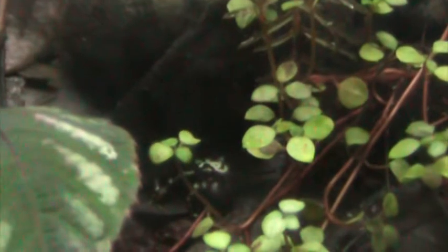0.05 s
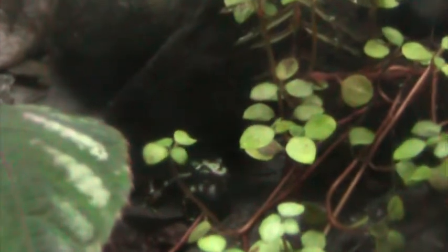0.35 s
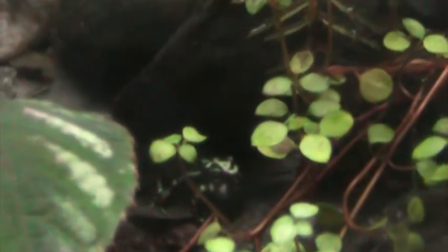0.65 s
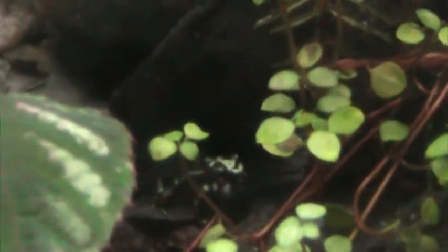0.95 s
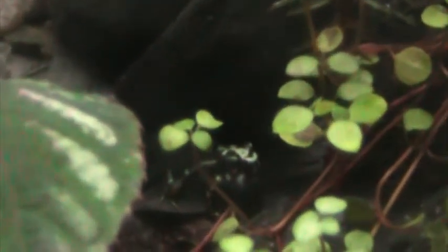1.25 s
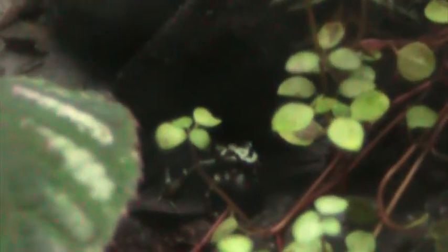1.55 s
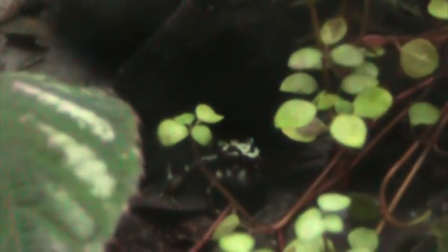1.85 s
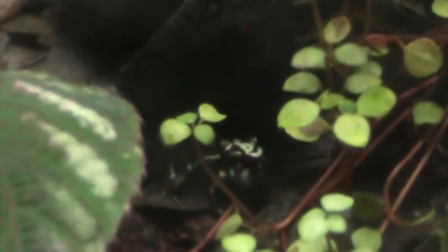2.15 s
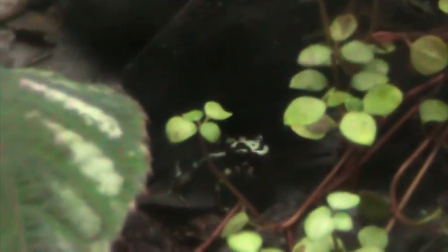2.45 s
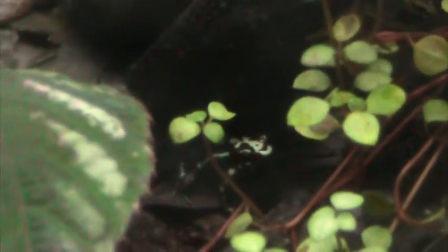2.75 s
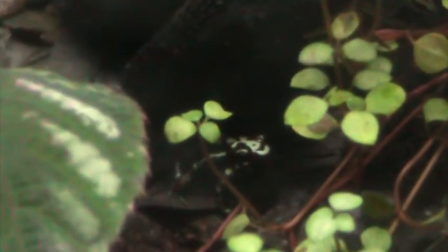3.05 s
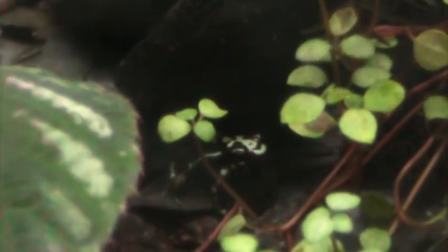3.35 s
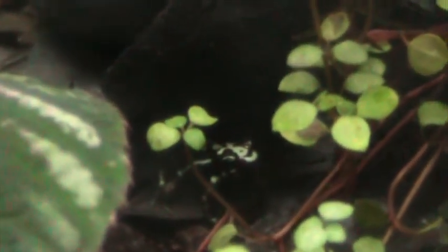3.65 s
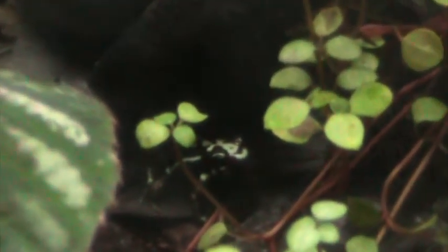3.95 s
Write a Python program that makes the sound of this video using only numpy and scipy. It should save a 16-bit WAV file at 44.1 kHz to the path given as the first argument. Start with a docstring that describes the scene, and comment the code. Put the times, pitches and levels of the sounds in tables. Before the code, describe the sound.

A small frog trills loudly, high and fast, close to the microphone in a glass terrarium, then stops. A second frog chirps faintly further off throughout, over a low fan hum and a few soft thuds.

```python
"""A bright trill, close by: a small poison frog in a glass terrarium sings thirty rising notes a second
that slow and sag, then one lower closing note. The glass echoes each note to a stereo microphone pair.
Further off, a second frog chirps faintly throughout. A fan hums in the room, soft low thuds, probably
footfalls, come through the floor, and there are a few faint rustles and ticks."""
import sys
import numpy as np
from scipy import signal
from scipy.fft import rfft, irfft, next_fast_len
from scipy.io import wavfile
from scipy.ndimage import uniform_filter1d

SR = 44100
rng = np.random.default_rng(int(sys.argv[2]) if len(sys.argv) > 2 else 0)


def int16_out(signal):
    """Quantize to a 16-bit WAV file."""
    q = np.round(np.clip(np.atleast_2d(signal).T, -1, 1) * 32767)
    wavfile.write(sys.argv[1], SR, q.astype(np.int16))


N = 176400


def near_frog():
    """A trill of upward sweeps slows, sags and grows louder; the vocal sac favours the second harmonic."""
    pitch_hz, sag_hz_per_s, swell_db_per_s = 2302, 21, 1.65
    closing_s, closing_hz, closing_db = 2.3105, 2195, -2.5
    times = note_times(first_s=.0029, gap_s=.03219, growth_s=.0000779, count=66)
    pitch_jitter, level_jitter, time_jitter, click_jitter = rng.standard_normal((len(times), 4)).T
    pitches = (pitch_hz - sag_hz_per_s * times) * (1 + .001 * pitch_jitter)
    levels = -.5 + swell_db_per_s * times + level_jitter
    envelope, phase = notes(np.append(times + .000311 * time_jitter, closing_s),
                            np.append(pitches, closing_hz), np.append(levels, closing_db),
                            sweep_hz_per_s=15000, bend_hz_per_s2=150000, rough_hz=16,
                            attack_s=.0098, release_s=.007)
    fundamental = undb(-27) * resonate(envelope * np.sin(phase), hz=2380, width_hz=110)
    second = envelope * np.sin(2 * phase)
    third = undb(-25) * resonate(envelope * np.sin(3 * phase), hz=5013, width_hz=450)
    rasp = undb(-42.5) * envelope * hiss(hz=5044, width_hz=980)
    t = clock() + .004  # a faint click comes 4 ms early, as each note opens
    click_envelope = sum(undb(db) * np.maximum(1 - abs(t - at) / .0042, 0)
                         for at, db in zip(times, -54.5 + 7 * click_jitter))
    return fundamental + second + third + rasp + click_envelope * hiss(hz=6700, width_hz=1900)


def terrarium(voice):
    """The glass throws early echoes to each microphone; tank and room add short tails."""
    # direct sound and echoes off the glass at the left and right microphones: delay/ms, level/dB
    glass_left = [(0, -15), (.552, -14), (3.954, -25), (5.156, -20), (14.272, -47)]
    glass_right = [(0, -18.6), (.797, -17.5), (3.334, -25), (5.235, -26), (7.334, -25.5), (11.635, -32.5)]
    right_lag_ms = .187
    left = echoes(voice, glass_left)
    right = echoes(voice, [(ms + right_lag_ms, db) for ms, db in glass_right])
    tank = undb(-37) * reverb(voice, t60_s=.07)
    room = undb(-29.5) * reverb(voice, t60_s=.29)
    return np.array([left, right]) + tank + room


def far_frog():
    """Fourteen lower chirps a second, distant and reverberant; each sweep's top rings the enclosure."""
    times = note_times(first_s=.046, gap_s=.07043, growth_s=.000064, count=56)
    pitch_jitter, level_jitter = rng.standard_normal((len(times), 2)).T
    envelope, phase = notes(times, 1683 * (1 + .007 * pitch_jitter), -48 + .56 * level_jitter,
                            sweep_hz_per_s=10000, bend_hz_per_s2=210000, rough_hz=48,
                            attack_s=.016, release_s=.034)
    voice = envelope * (np.sin(2 * phase) + undb(-8.5) * np.sin(3 * phase))
    voice += resonate(voice, hz=3510, width_hz=70)
    return undb(-2) * voice + undb(2.5) * reverb(voice, t60_s=.24)


def fan():
    """Room tone: the fan's wavering hum over its steady rush of air."""
    # fan and mains tones: f/Hz, level/dB
    hum_tones = [(120, -71.5), (240, -72), (300, -62.5), (478.5, -65.5), (598, -84.5), (798.5, -64),
                 (836, -59), (2509, -70)]
    # spectral density of the rushing air: f/Hz, relative level/dB
    air_spectrum = [(25, -1), (60, 0), (100, -8), (170, -4.5), (260, 0.5), (450, -0.5), (620, -3), (840, 2),
                    (1100, -4), (2000, -6.5), (2800, -10.5), (4400, -17), (7000, -20.5), (10000, -27),
                    (15500, -34.5)]
    # how alike the air sounds at the two microphones: f/Hz, correlation (-1 to 1)
    air_likeness = [(60, 0.023), (130, 0), (290, 0.052), (640, 0.62), (1400, 0.56), (3100, 0.65),
                    (12000, 0.016)]
    likeness, sides = over_spectrum(air_likeness), np.array([[1], [-1]])
    mid, side = rfft(rng.standard_normal((2, N)))
    stereo_noise = mid * np.sqrt(1 + likeness) + sides * side * np.sqrt(1 - likeness)
    out = undb(-50.5) * unit(irfft(undb(over_spectrum(air_spectrum)) * stereo_noise, N))
    pitch_drift, waver_db = .002, 1.5
    for hz, db in hum_tones:
        phase = 2 * np.pi * np.cumsum(hz * (1 + pitch_drift * walk(14))) / SR
        out += np.sqrt(2) * undb(db + waver_db * walk(4.1)) * np.sin(phase + .1 * sides)
    return out


def thuds():
    """Each soft blow rocks the floor briefly and leaves a low rumble."""
    # blows on the floor: t/s, level/dB
    floor_blows = [(0.211, -44), (0.299, -53), (.8, -49.5), (1.394, -44.5), (1.465, -59), (1.931, -46.5),
                   (2.467, -46.5), (3.061, -54)]
    floor_hz, push_s, rumble_t60_s = 62, .014, .53
    t, blows, rumble = clock(), np.zeros(N), np.zeros(N)
    for at, db in floor_blows:
        age = np.maximum(t - at, 0)
        push = age / push_s * np.exp(1 - age / push_s)
        blows += undb(db) * push * np.sin(2 * np.pi * floor_hz * age)
        rumble += undb(db) * (1 - np.exp(-age / push_s)) * np.exp(-np.log(1000) * age / rumble_t60_s)
    return blows + undb(1) * rumble * hiss(hz=35, width_hz=50)


def rustles_and_ticks():
    """Faint bands of noise: rustles swell and fade, tiny high ticks start sharply and die at once."""
    # rustles: peak t/s, fade/s, centre f/Hz, width/Hz, level/dB
    rustles = [(.33, 0.09, 325, 300, -47), (1.961, 0.1, 278, 256, -51), (2.932, 0.066, 6050, 800, -64),
               (3.6, 0.067, 6300, 800, -68)]
    # ticks: t/s, level/dB
    ticks = [(.103, -44), (1.42, -48), (1.569, -51), (1.752, -53)]
    tick_decay_s = .0053
    t, out = clock(), np.zeros((2, N))
    for at, fade_s, hz, width_hz, db in rustles:
        out += undb(db) * swell(t - at, fade_s / 2, fade_s) * wide_hiss(hz, width_hz)
    tick_envelope = sum(undb(db) * (t > at) * np.exp(-abs(t - at) / tick_decay_s) for at, db in ticks)
    return out + tick_envelope * wide_hiss(hz=6630, width_hz=730)


def note_times(first_s, gap_s, growth_s, count):
    """Each gap is a little longer than the one before."""
    k = np.arange(count)
    return first_s + gap_s * k + growth_s * k ** 2 / 2


def notes(times, pitches, levels, sweep_hz_per_s, bend_hz_per_s2, rough_hz, attack_s, release_s):
    """Envelope and fundamental phase of a run of slightly rough upward sweeps that ease off as they rise."""
    t, envelope, phase = clock(), np.zeros(N), np.zeros(N)
    for at, hz, db in zip(times, pitches, levels):
        span = slice(*np.searchsorted(t, [at - attack_s, at + release_s]))
        u = t[span] - at
        envelope[span] = undb(db) * swell(u, attack_s, release_s)
        glide_hz = hz + sweep_hz_per_s * u - bend_hz_per_s2 * u ** 2
        phase[span] = 2 * np.pi * (np.cumsum(glide_hz) / SR + rng.random())
    fade_in = np.minimum(t / .003, 1)
    roughness = 2 * np.pi * np.cumsum(rough_hz * walk(900)) / SR
    return envelope * fade_in, phase + roughness


def echoes(x, paths):
    """Delayed copies of a sound, summed."""
    size = next_fast_len(N + SR // 10)
    f = np.fft.rfftfreq(size, 1 / SR)
    response = sum(undb(db) * np.exp(-2j * np.pi * f * ms / 1000) for ms, db in paths)
    return irfft(rfft(x, size) * response, size)[:N]


def reverb(x, t60_s):
    """A diffuse tail of unit energy, different at each microphone."""
    t = clock()
    tail = rng.standard_normal((2, N)) * np.exp(-np.log(1000) * t / t60_s) * (1 - np.exp(-t / .002))
    return signal.fftconvolve(x[None], unit(tail) / np.sqrt(N), axes=1)[:, :N]


def resonate(x, hz, width_hz):
    """One resonance, gain 1 at its centre."""
    return signal.lfilter(*signal.iirpeak(hz, hz / width_hz, fs=SR), x + 1e-18)


def hiss(hz, width_hz):
    """A band of noise, rms 1."""
    return unit(resonate(resonate(rng.standard_normal(N), hz, width_hz), hz, width_hz))


def wide_hiss(hz, width_hz):
    """A stereo band of noise, half its power common to both microphones."""
    return unit(np.array([hiss(hz, width_hz), hiss(hz, width_hz)]) + hiss(hz, width_hz))


def walk(rate_hz):
    """A smooth random wander with a spread near 1."""
    hold = int(SR / rate_hz)
    steps = np.repeat(rng.standard_normal(N // hold + 1), hold)
    return 1.3 * uniform_filter1d(uniform_filter1d(steps, hold), hold)[:N]


def swell(u, attack_s, release_s):
    """A rounded rise and fall that peaks at u = 0."""
    return np.cos(np.pi / 2 * np.clip(np.where(u < 0, u / attack_s, u / release_s), -1, 1)) ** 2


def over_spectrum(table):
    """A curve interpolated to every FFT bin along log frequency."""
    hz, values = np.array(table).T
    return np.interp(np.log(np.fft.rfftfreq(N, 1 / SR) + 1), np.log(hz), values)


def undb(db):
    return 10 ** (np.asarray(db) / 20)


def unit(x):
    return x / np.sqrt(np.mean(x ** 2))


def clock():
    return np.arange(N) / SR


def scene():
    """At the microphones: the near frog in its terrarium, the far frog and the room behind."""
    return terrarium(near_frog()) + far_frog() + fan() + thuds() + rustles_and_ticks()


def record(dry):
    """The recorder cuts the top steeply."""
    top_hz = 15700
    return signal.sosfilt(signal.ellip(10, .1, 70, top_hz, fs=SR, output="sos"), dry)


dry = scene()
out = record(dry)
int16_out(out)
```